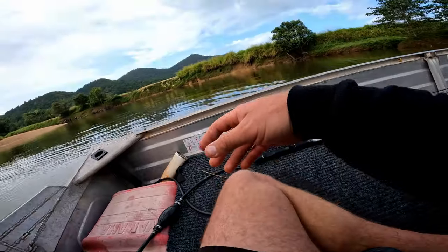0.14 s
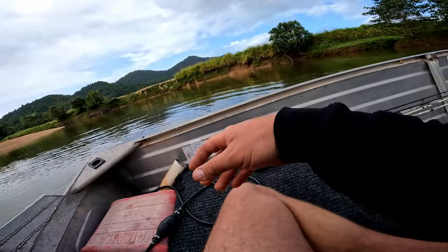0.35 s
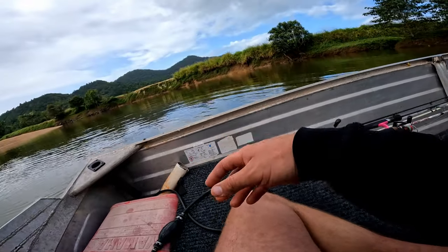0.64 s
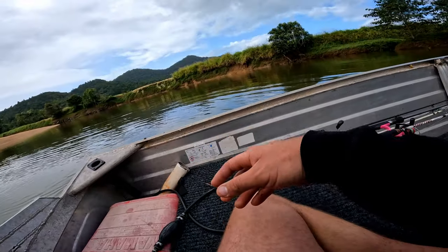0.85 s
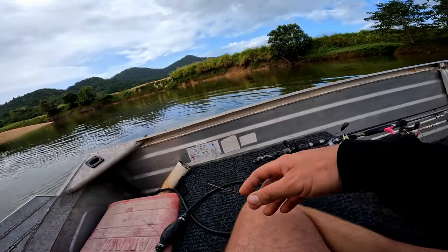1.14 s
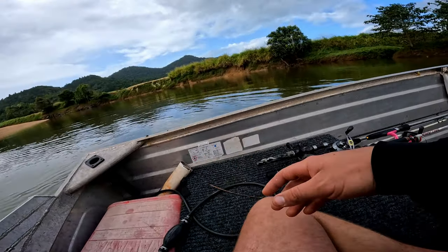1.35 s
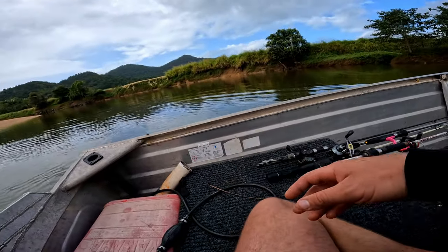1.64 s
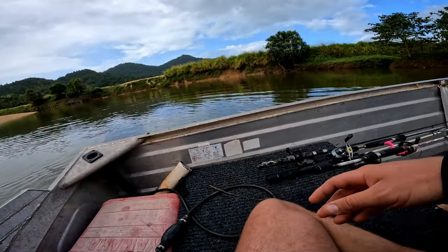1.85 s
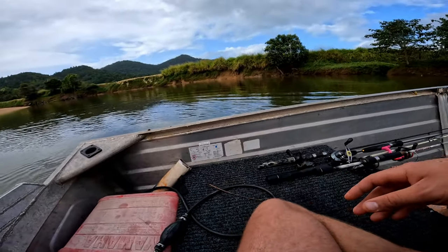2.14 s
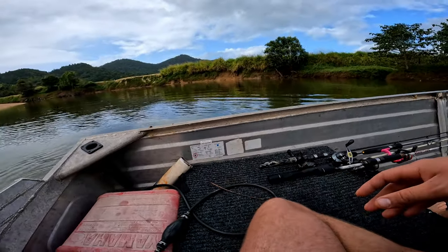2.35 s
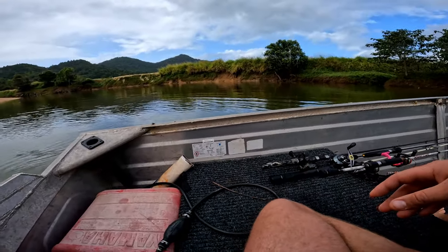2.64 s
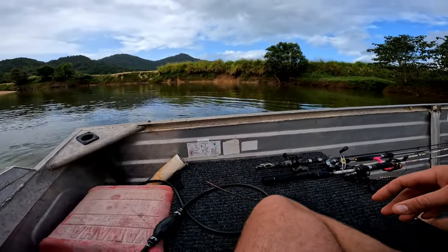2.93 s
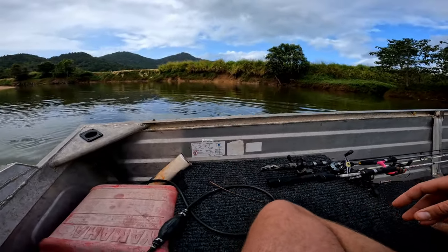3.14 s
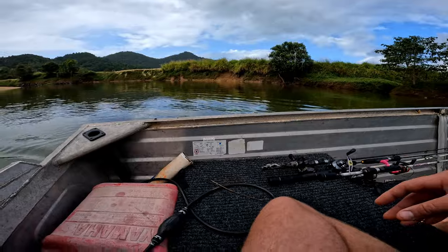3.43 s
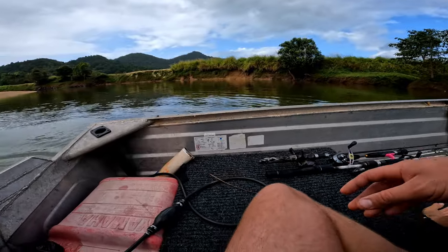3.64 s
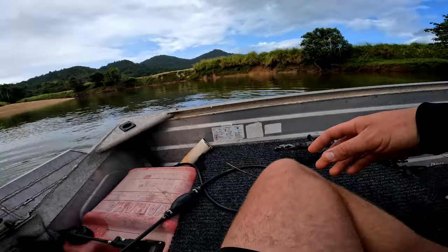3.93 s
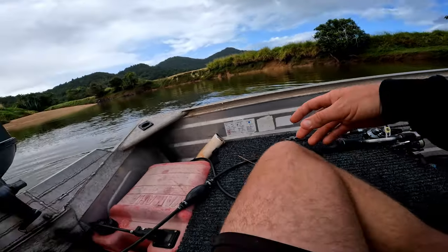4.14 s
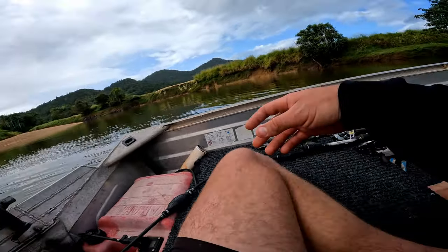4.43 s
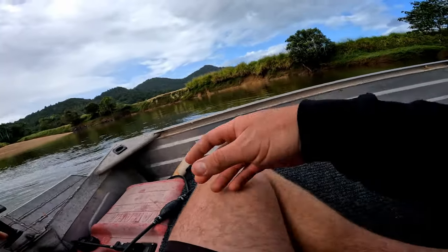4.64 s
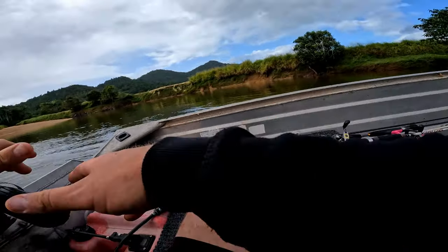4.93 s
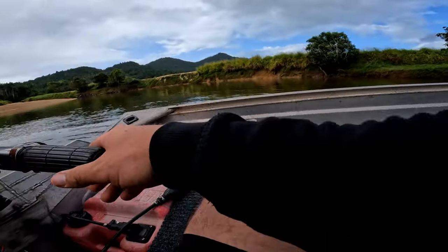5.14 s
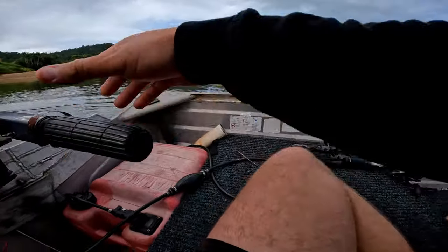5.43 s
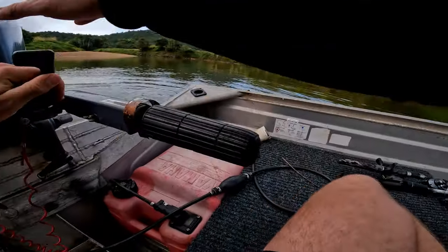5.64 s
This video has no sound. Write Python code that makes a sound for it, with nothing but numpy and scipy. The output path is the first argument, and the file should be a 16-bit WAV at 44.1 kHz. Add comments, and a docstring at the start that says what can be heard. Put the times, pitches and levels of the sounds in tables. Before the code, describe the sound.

Hollow knocks and metallic clacks boom through a small aluminium boat hull on calm water, with plops, a squeaky judder and a heavy drop.

```python
"""A small aluminium boat on a calm river, heard from the stern seat while the outboard is readied for starting.
Over a low noise rumble, swishes of hiss and water plops of ringing bubbles, the tilt latch clacks in
gritty noise and struck modes; the stick-slip pivot sings faintly. Lighter knocks, clicks and a spring ping follow.
A floor plate pops, the pivot squeaks and judders in slowing slips, and the motor drops onto its stop,
booming through the ringing hull modes. A few hums, knocks, clicks and plops remain."""
import sys
import numpy as np
from scipy import signal
from scipy.fft import rfft, irfft, next_fast_len
from scipy.io import wavfile
from scipy.ndimage import uniform_filter1d

SR = 44100
rng = np.random.default_rng(int(sys.argv[2]) if len(sys.argv) > 2 else 0)


def wrap_up_sound(samples):
    """Save the sound to the file named by the first command line argument, as 16-bit audio."""
    columns = np.atleast_2d(samples).T
    # keep every value between -1 and 1, then stretch to whole-number steps
    tamed = np.clip(columns, -1, 1)
    steps = np.round(tamed * 32767).astype(np.int16)
    wavfile.write(sys.argv[1], SR, steps)


N = 255780
T = np.arange(N) / SR
AGE = T[:SR]  # the first second after an onset
ONSET = 800  # samples over which a struck sound is levelled


def undb(db):
    """Decibels to gain."""
    return 10 ** (np.asarray(db) / 20)


def unit(x, size=None):
    """Scale to rms 1, over the first samples if a size is given."""
    return x / np.sqrt(np.mean(x[:size] ** 2))


def fade(t60, age=AGE):
    """Free exponential decay, 60 dB down after t60 seconds."""
    return np.exp(-np.log(1000) * age / t60)


def swell(s, rise_s, hold_s, t60):
    """Smooth attack from a start time, hold, free release."""
    attack = np.sin(np.pi / 2 * np.clip((T - s) / rise_s, 0, 1)) ** 2
    return attack * fade(t60, np.maximum(T - s - rise_s - hold_s, 0))


def curve(rows):
    """A control curve, joined by straight lines in time."""
    return np.interp(T, *np.transpose(rows))


def walk(rate):
    """Random drift in straight segments, about `rate` new targets a second, rms about 0.8."""
    size = int(SR / rate)
    steps = rng.standard_normal(N)[np.arange(N) // size]
    return uniform_filter1d(steps, size)


def noise(size=N):
    """White noise of rms about 1."""
    return rng.standard_normal(size)


def response(points, size):
    """Gain of (f/Hz, level/dB) points on the bins of a transform."""
    hz, db = np.transpose(points)
    bins_hz = np.fft.rfftfreq(size, 1 / SR)
    return undb(np.interp(np.log(bins_hz + 1), np.log(hz), db))


def colour(x, points):
    """Causal minimum-phase filter through (f/Hz, level/dB) points."""
    size = next_fast_len(len(x) + 4096, True)
    cepstrum = irfft(np.log(response(points, size)), size)
    # folding the cepstrum forward makes the filter causal
    cepstrum[1:size // 2] *= 2
    cepstrum[size // 2:] = 0
    return irfft(rfft(x, size) * np.exp(rfft(cepstrum)), size)[:len(x)]


def resonate(x, hz, share):
    """One resonance whose width is a share of its centre."""
    return signal.lfilter(*signal.iirpeak(hz, 1 / share, fs=SR), x)


def narrow_band(x, hz, share):
    """Two equal resonances in a row, for steeper skirts."""
    return resonate(resonate(x, hz, share), hz, share)


def ring(modes, stretch=1, scatter_db=0):
    """Struck modes; their shares change with the spot that is hit."""
    chance = rng.standard_normal(len(modes))
    total = np.zeros(SR)
    for (hz, db, t60), c in zip(modes, chance):
        total += undb(db + scatter_db * c) * fade(t60 * stretch) * np.sin(2 * np.pi * hz * AGE)
    return total


def add(out, s, sound):
    """Mix a sound in at a time."""
    start = max(int(s * SR), 0)
    out[start:start + len(sound)] += sound[:max(N - start, 0)]


# tone of the low rumble: f/Hz, level/dB
RUMBLE_COLOUR = [(20, 4), (32, 0.5), (42, 1.5), (62, 3.5), (85, -1.5), (180, -5.5), (280, -6.5), (450, -21),
                 (800, -49), (1500, -41), (4000, -77)]
RUMBLE_DB = -43  # at rest
ROCKING_DB, ROCKING_T60_S = -22.5, 1.04  # rumble left by a blow, relative to it, and its decay


def rumble(rocking_rise_s=0.065):
    """The hull rumbles as low noise, more while it rocks after a blow."""
    power = undb(RUMBLE_DB) ** 2
    for s, db, *_ in blows():
        power = power + (undb(db + ROCKING_DB) * swell(s, rocking_rise_s, 0, ROCKING_T60_S)) ** 2
    return unit(colour(noise(), RUMBLE_COLOUR)) * np.sqrt(power) * undb(1.5 * walk(14))


# tone of the hiss and swishes: f/Hz, level/dB
HISS_COLOUR = [(300, 2.5), (800, -0.5), (1500, -1), (3000, -4), (4200, -8), (6200, -10.5), (7100, -23.5),
               (8300, -21), (9400, -17.5), (11200, -25.5), (12500, -15), (13800, -26), (15500, -29.5)]
# soft swishes, probably a sleeve as the arm moves: t/s, rise/s, hold/s, level/dB
SWISHES = [(-.05, 0.044, 0.11, -55.5), (0.186, 0.11, 0.27, -59), (1.093, 0.26, 0.054, -56.5),
           (1.7, .2, 0.64, -63), (3.522, 0.022, 0.31, -54.5), (3.828, 0.45, 0.17, -56.5),
           (4.53, 0.16, 0.65, -65), (5.346, .42, .1, -52.5)]
SWISH_T60_S, HISS_DB = 0.64, -71.5


def swishes():
    """Noise swells rise out of a steady soft hiss of the same tone."""
    power = undb(HISS_DB) ** 2
    for s, rise_s, hold_s, db in SWISHES:
        power = power + (undb(db) * swell(s, rise_s, hold_s, SWISH_T60_S)) ** 2
    return unit(colour(noise(), HISS_COLOUR)) * np.sqrt(power) * undb(0.66 * walk(36))


WHIR_HZ, WHIR_DB = 5280, -74.5


def whir():
    """A thin high whir hangs over the bank: noise peaked at one pitch, wavering slowly in level."""
    peak = [(0.68 * WHIR_HZ, -35), (.93 * WHIR_HZ, -10), (WHIR_HZ, 0),
            (1.1 * WHIR_HZ, -11), (1.48 * WHIR_HZ, -16), (2 * WHIR_HZ, -35)]
    return unit(colour(noise(), peak)) * undb(WHIR_DB + 1.3 * walk(5.7))


# a spell of smaller plops at random
PATTER_S, PATTER_LENGTH_S, PATTER_T60_S = 1.3, 1.1, 0.065
PATTER_HZ, PATTER_OCTAVES, PATTER_DB = 1007, 0.86, -56  # middle pitch, spread either way, middle level


def patter(count=6, scatter_db=3):
    """Small plops at loose intervals, as (t/s, f/Hz, level/dB, t60/s)."""
    plops = []
    for k, (when, pitch, strength) in enumerate(rng.uniform(-1, 1, (count, 3))):
        s = PATTER_S + PATTER_LENGTH_S * (k + when / 2) / count
        hz = PATTER_HZ * 2 ** (PATTER_OCTAVES * pitch)
        plops.append((s, hz, PATTER_DB + scatter_db * strength, PATTER_T60_S))
    return plops


def bubble(hz, t60, glide=0.016, rise_s=0.022):
    """A pocket of air trapped against the plates swells and rings, rising a little in pitch."""
    phase = 2 * np.pi * np.cumsum(hz * (1 + glide * np.minimum(AGE / t60, 1))) / SR
    return np.sin(phase) * fade(t60) * (1 - fade(rise_s)) ** 2


# the clearest plops and plinks, mostly water under the hull: t/s, f/Hz, level/dB, t60/s
PLOPS = [(0.119, 1160, -51.5, 0.074), (.22, 5130, -55, 0.14), (1.293, 1236, -41.5, .06),
         (1.318, 1323, -44.5, 0.029), (1.365, 1251, -50, .08), (1.474, 2800, -55.5, 0.15),
         (1.499, 418, -48.5, 0.16), (1.566, 483, -48.5, 0.051), (1.62, 1760, -56, .035),
         (1.68, 418, -39.5, .27), (1.716, 2083, -54.5, 0.071), (1.837, 472, -42.5, 0.12),
         (2.033, 2970, -53.5, .06), (2.073, 3110, -54.5, 0.026), (2.155, 1350, -45.5, .03),
         (2.234, 1310, -44, 0.35), (2.247, 1710, -46, 0.085), (2.394, 2626, -49, .1),
         (2.454, 1743, -47.5, 0.11), (4.426, 2564, -52, 0.042), (5.204, 3286, -56.5, 0.1),
         (5.429, 1610, -43, .1), (5.545, 656, -50.5, 0.087)]
# how strongly the water laps: t/s, level/dB
LAPPING = [(0, -53), (.6, -50), (.95, -64), (1.4, -55), (2.3, -52), (2.9, -57), (3.9, -61.5), (4.6, -70),
           (5.8, -61.5)]


def water(tone_db=-4, froth_db=-2, spread=0.22, swell_s=0.032, slosh_db=4):
    """Each slap traps one main bubble in a cloud of similar ones; ripples slosh softly in between."""
    out = np.zeros(N)
    for s, hz, db, t60 in PLOPS + patter():
        cloud = noise(SR) * fade(t60) * (1 - fade(swell_s))
        froth = undb(froth_db) * unit(narrow_band(cloud, hz, spread), ONSET)
        tone = undb(tone_db) * unit(bubble(hz, t60), ONSET)
        add(out, s - .002, undb(db) * (tone + froth))  # the swell starts just ahead
    ripples = np.zeros(N)
    for hz, db in [(420, 7.5), (580, -5.5), (900, -4), (1250, -3.0), (1750, -10.5)]:
        ripples += undb(db + slosh_db * walk(22)) * unit(narrow_band(noise(), hz, 0.47))
    return out + unit(ripples) * undb(curve(LAPPING))


# soft bumps on the hull: t/s, level/dB, boom at 130 Hz/dB, ring time factor
THUDS = [(.003, -31.5, 3.5, 1.5), (0.4048, -18.5, 7, 1.18), (0.587, -33, 2, 1.2), (1.804, -33.5, -4, 1.08),
         (2.295, -38, -0.5, .4), (2.4684, -19.5, -1, 0.93), (2.6533, -18, -0.5, 0.83),
         (4.4031, -23, 1, 0.82), (4.4264, -26, 3.5, 0.96), (5.241, -40.5, -13, .95),
         (5.4711, -34.5, -6, 0.91), (5.5568, -31, 6.5, .55)]
# metal parts of the bracket, latch and controls clack and pass the blow to the hull:
# t/s, hull level/dB, boom at 130 Hz/dB, metal level/dB, metal tilt/(dB per octave), ring time factor
CLACKS = [(0.3224, -15, -1, -23.5, 0, 0.97), (.348, -24.5, -10.5, -27.5, 1.5, 0.91),
          (0.3682, -21, -3.5, -27.5, 0.4, 0.94), (1.272, -26.5, -5.5, -32.5, -7, 0.78),
          (2.413, -14.5, -4, -35, -1.5, 0.53), (3.021, -29.5, -4.5, -42.5, -17, 1.4),
          (3.0535, -12.5, 1, -22.5, -1.5, 0.76), (3.093, -18.5, 4.5, -27.5, -8.5, 1.6),
          (3.139, -21, -1.5, -27, -2.9, 1.22), (3.1748, -9, 2.5, -22.5, -6.5, .75),
          (3.202, -24, -5.5, -30, -5.5, 0.95), (3.2324, -23, 11, -39.5, -6.5, 2.5),
          (3.62, -44.5, -10, -45.5, -4.5, 1.1), (3.93, -31.5, 0, -44, -6.5, 0.51),
          (3.984, -45, -2, -53, -8.5, 0.64), (5.43, -31.5, -7, -43, -1.5, 0.77)]
HULL_LAG_S = 0.00354  # from the clack to the answer of the plates
# hull gain at 450-800 Hz: metal and hull equally loud; per dB more metal; soft bumps
HARD_DB, HARD_PER_DB, SOFT_DB = 8.5, 0.58, -11.5


def blows():
    """Every hull blow as (t/s, level/dB, boom/dB, hardness/dB, ring factor); more metal makes it harder."""
    hard = []
    for s, db, boom_db, metal_db, _, stretch in CLACKS:
        hard_db = HARD_DB + HARD_PER_DB * (metal_db - db)
        hard.append((s + HULL_LAG_S, db, boom_db, hard_db, stretch))
    return hard + [(s, db, boom_db, SOFT_DB, stretch) for s, db, boom_db, stretch in THUDS]


# clear modes of the hull plates: f/Hz, level/dB, t60/s at ring time factor 1
HULL_MODES = [(68.4, -7, 0.51), (83, -29, 0.21), (100.9, -2.5, 0.47), (117.8, -0.5, 0.34),
              (134.5, 5.5, 0.22), (164, 1.5, 0.32), (206.2, -3, 0.2), (249.7, -7.5, 0.12),
              (280.7, -6, 0.31), (306.2, -6, 0.35), (341.8, -7, 0.27), (406, -12.5, 0.11),
              (446, -17.5, 0.24), (492, -5, 0.14), (594, -30, 0.96), (676, -28.5, 0.12)]
# tone of the dense modes between them: f/Hz, level/dB
HULL_WASH = [(30, -7.5), (70, 1), (200, 5), (350, -4.5), (550, -14), (800, -43.5), (1500, -37.5),
             (4000, -106)]


def hull(wash_db=-4, wash_t60=0.28, contact_s=0.011, sub_db=-13):
    """Blows ring the plates, each with its own amount of boom; hard ones reach the higher modes."""
    out = np.zeros(N)
    for s, db, boom_db, hard_db, stretch in blows():
        wash = colour(noise(SR) * fade(wash_t60 * stretch), HULL_WASH)
        modes = ring(HULL_MODES, stretch, scatter_db=0.56)
        plates = unit(modes, ONSET) + undb(wash_db) * unit(wash, ONSET)
        # the bent plate radiates neither the deepest push nor the treble
        radiation = [(25, sub_db + boom_db), (60, 2.53 * boom_db), (130, boom_db), (240, 0.0014),
                     (450, hard_db), (800, hard_db), (2500, hard_db - 18)]
        blow = colour(plates * (1 - fade(contact_s)), radiation)
        add(out, s, undb(db) * unit(blow, ONSET))
    return out


# light ticks of metal, some just before a soft bump: t/s, level/dB, tilt/(dB per octave)
TICKS = [(0.521, -47.5, -8.5), (1.3176, -44, 0), (1.4754, -46.5, -7), (1.7768, -52.5, -3),
         (1.8527, -42.5, 2), (2.033, -55.5, -1.5), (2.073, -61.5, 12), (2.1747, -47, 0),
         (2.4834, -48.5, -1.5), (2.649, -37, -6.5), (2.764, -41.5, -5), (3.119, -27.5, -9.5),
         (3.4389, -45.5, -7), (4.391, -41.5, 1), (4.4259, -49, 2), (4.842, -59, 0.5), (4.9266, -59, 5),
         (5.2122, -53, 0), (5.4508, -45, -4)]
METAL_T60_S = 0.09  # decay of a clack at ring time factor 1
TICK_T60_S, TICK_DOUBLES_DB = 0.063, 9  # decay of an untilted tick; loss of tilt per octave that doubles it


def contacts():
    """Every contact of metal as (t/s, level/dB, tilt/(dB per octave), t60/s); duller ticks last longer."""
    heavy = [(s, db, tilt_db, METAL_T60_S * stretch) for s, _, _, db, tilt_db, stretch in CLACKS]
    light = [(s, db, tilt_db, TICK_T60_S * 2 ** (-tilt_db / TICK_DOUBLES_DB)) for s, db, tilt_db in TICKS]
    return heavy + light


# clear modes of the bracket castings: f/Hz, level/dB, t60/s
BRACKET_MODES = [(705, -4, .2), (866, -1, .15), (942, -1, .14), (1105, -8, .13), (1642, -7, .1),
                 (1870, -7, .1), (2052, -7, .11), (2715, -9, .13), (3188, -11, .08), (5162, -13, .09),
                 (7537, -15, .09)]
# tone of the dense metal modes: f/Hz, level/dB
CLACK_COLOUR = [(150, -31.5), (450, -0.5), (820, 2), (1300, 0), (2000, -3), (3200, -6.5), (4300, -11.5),
                (6100, -10), (7000, -19), (11000, -21.5), (13000, -17.5), (15500, -33)]


def bracket(ring_db=-7, hull_db=-19, hull_t60=0.22, grit_db=3, slide_db=-18, slide_t60=0.098):
    """Parts slide into contact, then clack: gritty dense modes, a few clear ones, a dull tail from the boat."""
    out, lead = np.zeros(N), SR // 20  # 50 ms of sliding before the contact
    seat = 1 - fade(.003)
    for s, db, tilt_db, t60 in contacts():
        grit = undb(grit_db * np.repeat(noise(SR // 60), 60))  # uneven force in short steps
        slide = undb(slide_db) * fade(slide_t60)[lead::-1]  # grows towards the contact
        force = np.concatenate([slide, seat * grit * fade(t60)])
        metal = colour(noise(len(force)) * force, CLACK_COLOUR)
        metal /= np.std(metal[lead:lead + ONSET])
        # the plates keep only the middle of the clack alive
        tail = colour(noise(SR) * fade(hull_t60),
                      [(200, -19), (700, 3.5), (2500, 2.0), (6000, -20.0), (12000, -47)])
        castings = seat * ring(BRACKET_MODES, scatter_db=4.5)
        metal[-SR:] += undb(ring_db) * unit(castings, ONSET) + undb(hull_db) * unit(tail, ONSET)
        metal = colour(metal, [(800, 0), (12800, 4 * tilt_db)])  # tilted over four octaves
        add(out, s - lead / SR, undb(db) * metal / np.std(metal[lead:lead + ONSET]))
    return out


# parts left humming after a blow: t/s, f/Hz, level/dB, t60/s
HUMS = [(.33, 272.8, -26, 3.53), (1.326, 177, -25, 0.29), (2.05, 273.2, -33.5, .45),
        (3.18, 130.4, -30, 6.8), (3.2, 302.2, -31.5, 1.04), (3.93, 129.7, -35, 4.9),
        (5.52, 126.1, -24, 0.48)]


def hums(twin=0.055, beat_hz=4):
    """Lightly damped parts ring on, each beating against a weak twin mode."""
    out = np.zeros(N)
    for s, hz, db, t60 in HUMS:
        pair = np.sin(2 * np.pi * hz * T) + twin * np.sin(2 * np.pi * (hz + beat_hz) * T)
        add(out, s, undb(db) * pair * fade(t60, T) * (1 - fade(0.055, T)))
    return out


PIVOT_HZ, WAVER = 832, .009  # sung pitch; share by which the squeak's pitch wavers
# the pivot sings in short faint notes as the weight comes on it: t/s, level/dB
SING = [(.518, -41), (.58, -37.5), (.685, -46.5)]
SING_RISE_S, SING_HOLD_S, SING_T60_S = 0.026, 0.0061, 0.054


def sing():
    """Fast stick-slip in the pivot gives a faint pure note."""
    note = np.sin(2 * np.pi * np.cumsum(PIVOT_HZ * (1 + WAVER / 2 * walk(150))) / SR)
    load = sum(undb(db) * swell(s, SING_RISE_S, SING_HOLD_S, SING_T60_S) for s, db in SING)
    return np.sqrt(2) * note * load


# modes of a spring that pings once: f/Hz, level/dB (halved for the rattle), t60/s
SPRING_MODES = [(1585, 9.5, 0.37), (1675, -12, 1), (1730, 0, 0.95), (2120, -11, 0.26), (2310, 1, 0.17),
                (2600, 4, 0.4)]
SPRING_S, SPRING_DB = 1.856, -43


def spring(rattle_db=0, blur=0.029, rattle_t60=0.3):
    """A coil spring pings and rattles against its seat, which blurs each note into a narrow band."""
    chatter = noise(SR) * fade(rattle_t60)
    rattle = sum(undb(db / 2) * unit(narrow_band(chatter, hz, blur)) for hz, db, _ in SPRING_MODES)
    ping = unit(ring(SPRING_MODES), ONSET) / 2 + undb(rattle_db) * unit(rattle, ONSET)
    out = np.zeros(N)
    add(out, SPRING_S, undb(SPRING_DB) * ping)
    return out


# a floor plate pops under shifting weight: t/s, level/dB, starting f/Hz, final f/Hz, t60/s
BUCKLE = [(2.4146, 0.5, 456, 258, 0.039), (2.469, -16.5, 331, 186, 0.11)]


def buckle(settle_s=0.007, rise_s=0.0072):
    """The plate snaps through, stiff at first, and its pitch sinks as it relaxes."""
    out = np.zeros(N)
    for s, db, start_hz, end_hz, t60 in BUCKLE:
        pitch = end_hz + (start_hz - end_hz) * np.exp(-AGE / settle_s)
        phase = 2 * np.pi * np.cumsum(pitch) / SR
        add(out, s, undb(db) * np.sin(phase) * fade(t60) * (1 - fade(rise_s)) ** 2)
    return out


# tone of the judder's slips: f/Hz, level/dB
JUDDER_COLOUR = [(60, -11), (125, -8.5), (200, 1.5), (280, 2), (360, -19.5), (520, -25), (800, -46),
                 (2000, -45), (6000, -90)]
# tone of the grit ground in each slip: f/Hz, level/dB
GRIT_COLOUR = [(300, -11), (500, 7), (1000, 0.5), (1600, -12.5), (2400, -18), (5000, -36), (12000, -60)]
# the pivot judders through one swing of the motor, slipping ever more slowly
JUDDER_S, JUDDER_DB, JUDDER_HZ, JUDDER_SAG_HZ_PER_S = 2.625, -17, 136.5, 100
JUDDER_RISE_S, JUDDER_HOLD_S, JUDDER_T60_S = 0.14, 0.016, 0.37


def judder(jitter=0.08, scrape=0.067, grit_db=-35):
    """Slow, uneven slips of the swinging motor shake the transom; grit grinds most while the load is highest."""
    rate = JUDDER_HZ - JUDDER_SAG_HZ_PER_S * np.clip(T - JUDDER_S, 0, JUDDER_T60_S)
    turns = np.cumsum(rate * (1 + jitter * walk(120))) / SR
    # one impulse of uneven strength per slip
    slips = np.diff(np.floor(turns), prepend=0) * undb(1.2 * walk(120))
    groan = unit(colour(slips + scrape * noise(), JUDDER_COLOUR))
    grit = unit(colour(noise() * (1 - turns % 1), GRIT_COLOUR))
    load = swell(JUDDER_S, JUDDER_RISE_S, JUDDER_HOLD_S, JUDDER_T60_S)
    return undb(JUDDER_DB) * groan * load + undb(grit_db) * grit * load ** 4


# the dry pivot squeaks: t/s, level/dB, starting f/Hz, settled f/Hz
SQUEAK = [(2.645, -33, 853, 777), (2.77, -54.5, 800, 806)]
# harmonics of the squeak: multiple of its pitch, level/dB
SQUEAK_TONE = [(1, 2.5), (2, -7), (3, -30), (4, -14.5), (5, -21), (6, -18.5), (8, -26.5), (9, -39),
               (10, -37)]
SQUEAK_RISE_S, SQUEAK_HOLD_S, SQUEAK_T60_S, SQUEAK_SETTLE_S = 0.031, 0.01, 0.17, 0.025


def squeak(wobble_db=2, rasp_db=-18):
    """Fast stick-slip in the pivot: a rasping squeak that is brightest when loudest."""
    pitch, force = np.full(N, float(PIVOT_HZ)), np.zeros(N)
    for s, db, start_hz, end_hz in SQUEAK:
        glide = end_hz + (start_hz - end_hz) * np.exp(-((T - s) / SQUEAK_SETTLE_S) ** 2)
        pitch = np.where(T < s, pitch, glide)
        force += undb(db) * swell(s, SQUEAK_RISE_S, SQUEAK_HOLD_S, SQUEAK_T60_S)
    phase = 2 * np.pi * np.cumsum(pitch * (1 + WAVER * walk(500))) / SR
    bite = np.sqrt(force / force.max())  # a harder bite raises the overtones
    tone = np.zeros(N)
    for k, db in SQUEAK_TONE:
        tone += undb(db + wobble_db * walk(170)) * np.sin(k * phase) * (bite if k > 1 else 1)
    # grit scrapes once in every slip
    scrape = noise() * (1 + np.cos(phase))
    rasp = unit(colour(scrape, [(300, -14.0), (900, 0), (5000, -18.5), (12000, -32)]))
    return np.sqrt(2) * (tone + undb(rasp_db) * rasp) * force


def scene():
    """Everything reaches both channels alike."""
    boat = rumble() + swishes() + whir() + water() + hull() + bracket() + hums() + sing()
    boat += spring() + buckle() + judder() + squeak()
    return np.array([boat, boat])


# treble balance of the two ports: f/Hz, right minus left level/dB
RIGHT_PORT = [(8000, 0), (10200, 2), (11500, -12), (13000, -13.5), (16000, -8)]
TOP_HZ = 15400


def record(dry):
    """The right port is a little brighter near 10 kHz and duller above; peaks are rounded and the top is cut."""
    shade = response(RIGHT_PORT, N)
    # the two gains average 1
    gains = np.array([np.ones_like(shade), shade]) * 2 / (1 + shade)
    ports = irfft(rfft(dry) * gains, N)
    rounded = np.tanh(0.74 * ports) / 0.87
    return signal.sosfilt(signal.ellip(10, .2, 80, TOP_HZ, fs=SR, output="sos"), rounded)


dry = scene()
out = record(dry)
wrap_up_sound(out)
```